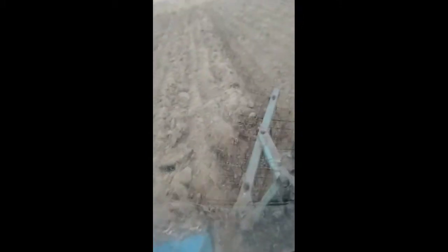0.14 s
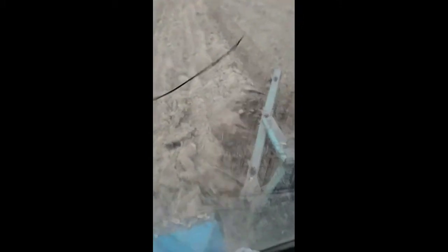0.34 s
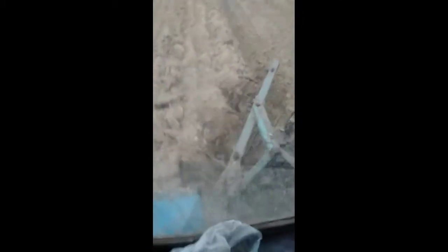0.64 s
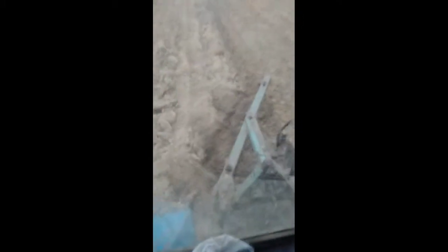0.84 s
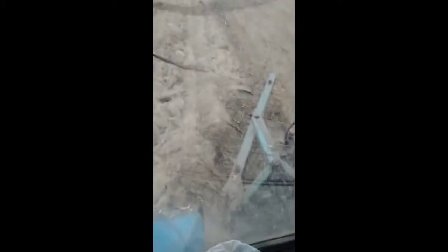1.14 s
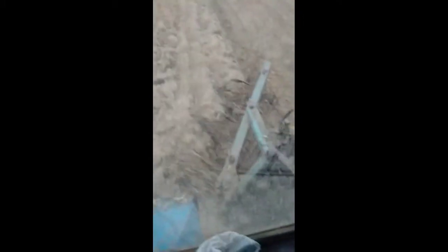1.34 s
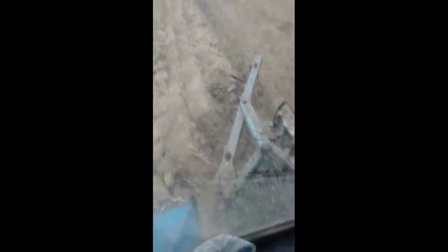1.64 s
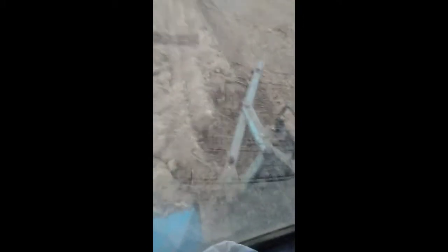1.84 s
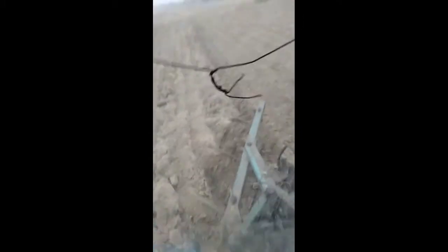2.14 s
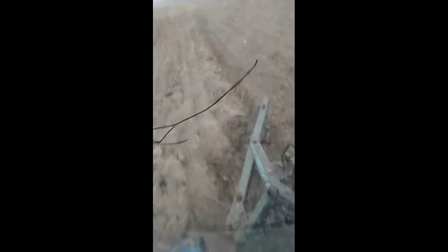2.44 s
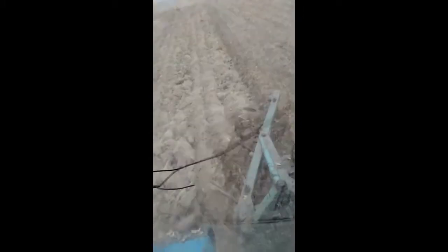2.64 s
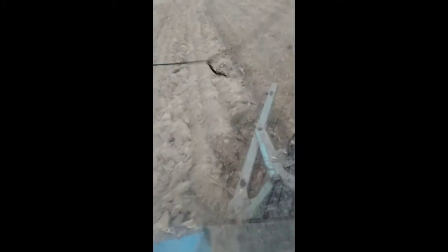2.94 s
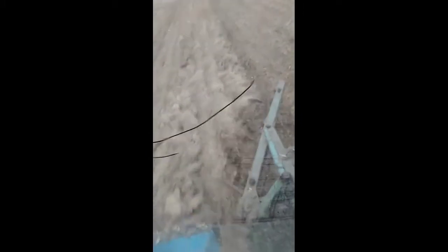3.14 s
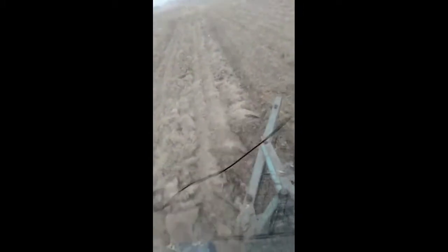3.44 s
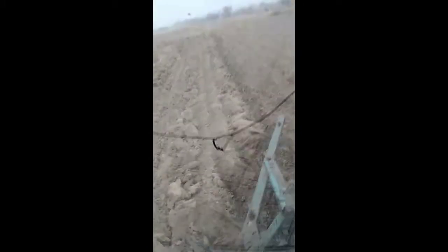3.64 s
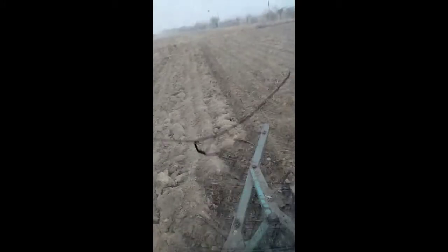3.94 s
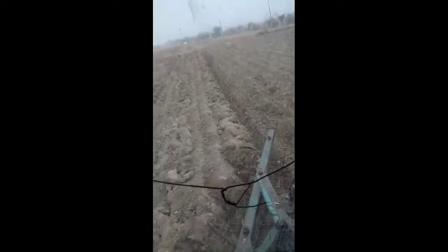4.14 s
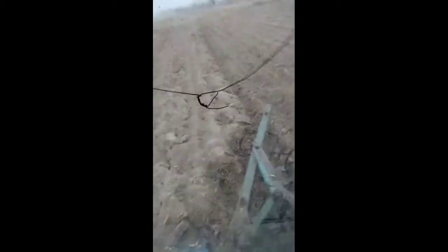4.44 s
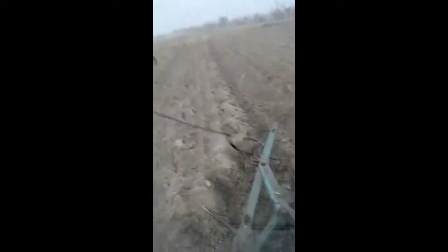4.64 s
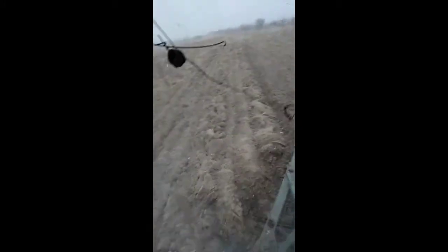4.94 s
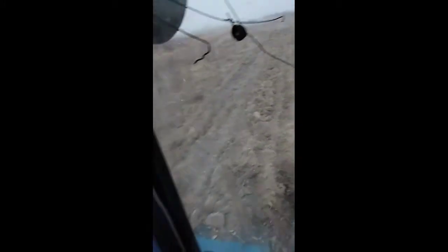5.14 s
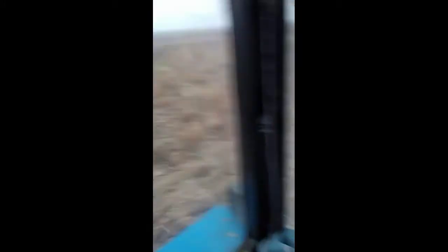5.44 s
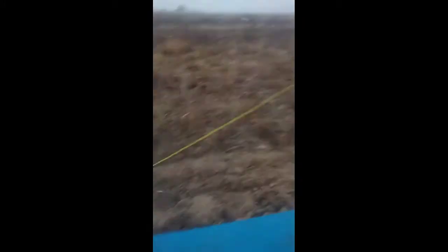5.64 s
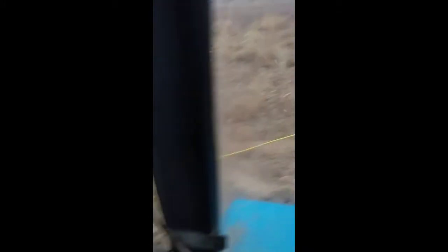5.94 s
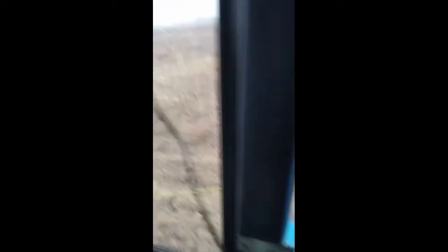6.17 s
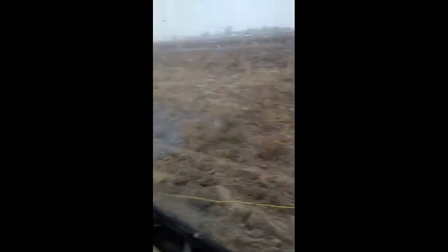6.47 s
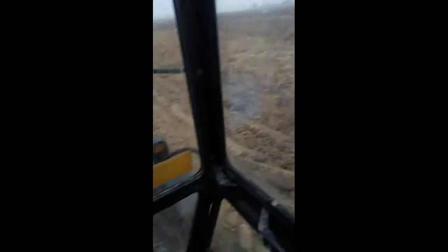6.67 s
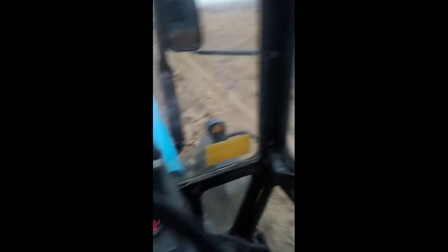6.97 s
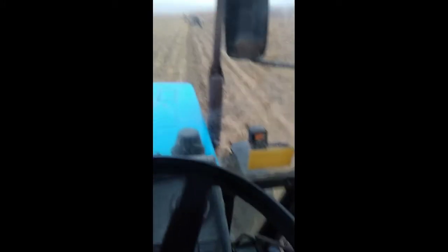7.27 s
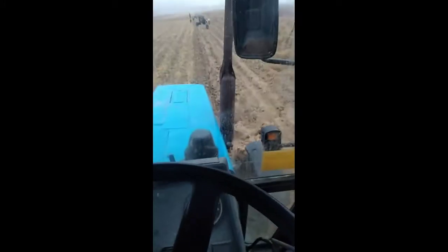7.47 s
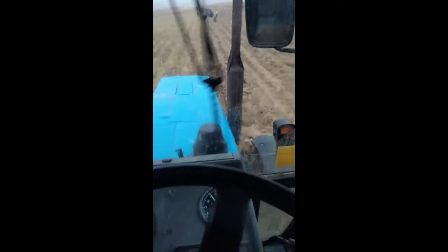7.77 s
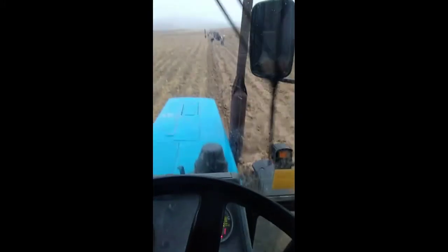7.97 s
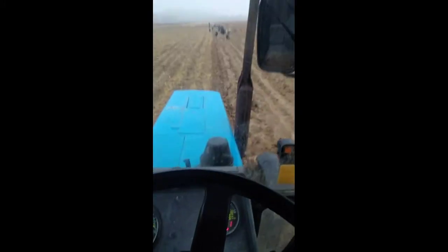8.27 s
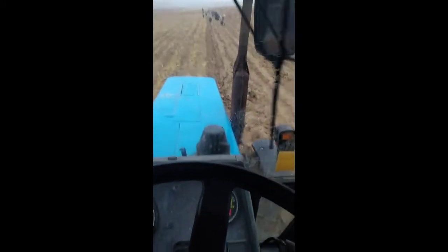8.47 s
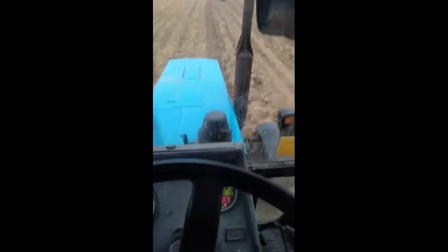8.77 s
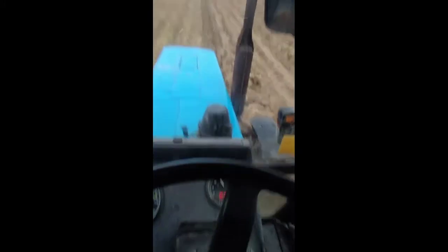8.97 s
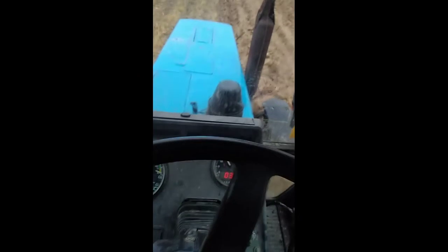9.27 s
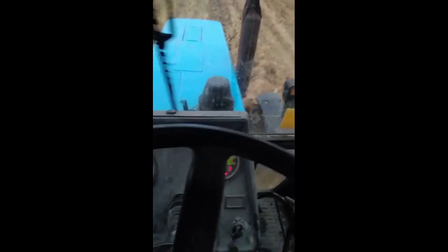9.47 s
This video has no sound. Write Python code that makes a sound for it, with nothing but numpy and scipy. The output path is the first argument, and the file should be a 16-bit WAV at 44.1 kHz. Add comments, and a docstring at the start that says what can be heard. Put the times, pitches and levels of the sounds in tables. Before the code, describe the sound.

Steady diesel engine heard from the driver's seat of a small, vibrating cab. Deep throbbing bass dominates, under broadband mechanical roar, faint glassy ringing and fizzing loose fittings. A few small clacks and squeaky trim ticks come early; then sharper knocks gather as the microphone turns forward, the roar grows harsher and the whine clearer, before everything eases somewhat at the end.

```python
"""Ploughing tractor, inside the cab

A four-cylinder diesel booms at its firing rate; higher orders drone, gear mesh whines at 12x, noise roars.
Filtered noise gives ground rumble and cab swells; struck modes give rattle, knocks and ringing panes.
From 5.25 s the microphone turns from the rear window to the dashboard, mostly within 0.7 s:
the boom's octave thins, roar and whine come forward."""
import sys
import numpy as np
from scipy import signal
from scipy.fft import rfft, irfft, next_fast_len
from scipy.io import wavfile
from scipy.ndimage import uniform_filter1d, minimum_filter1d, map_coordinates

SR = 44100
rng = np.random.default_rng(int(sys.argv[2]) if len(sys.argv) > 2 else 0)


def persist_wave(psi):
    """Save psi, clipped to +-1, as 16-bit WAV."""
    counts = np.round(np.clip(psi, -1, 1) * 32767).astype(np.int16)
    wavfile.write(sys.argv[1], SR, np.atleast_2d(counts).T)


N = 423801
TIME_S = np.arange(N) / SR

# microphone direction: t/s, facing/1 (0 rear window, 1 dashboard)
FACING = [(0, 0.0099), (5.25, 0), (5.6, .4), (5.95, 0.89), (6.6, 0.96), (9.61, 1)]
# engine speed, turning points: t/s, firing rate/Hz
FIRING_RATE = [(0.0, 49.3), (0.26, 48.62), (0.81, 48.65), (1.64, 47.85), (2.0, 49.62), (2.68, 48.3),
               (3.03, 48.96), (3.4, 48.95), (3.81, 48.12), (4.2, 48.66), (4.46, 47.51), (5.3, 47.6),
               (5.51, 49.26), (5.84, 47.56), (6.26, 48.63), (6.86, 47.36), (7.1, 48.96), (7.35, 48.7),
               (7.63, 50.22), (7.98, 48.74), (8.4, 51.06), (8.72, 49.5), (8.9, 50.3), (9.39, 49.56),
               (9.61, 49.4)]
# chassis rumble: t/s, level/dB
RUMBLE_LEVEL = [(0, -18.5), (2, -16), (5.2, -16.5), (7.4, -15.5), (8.7, -20), (9.61, -24)]
# chassis rumble spectrum: f/Hz, relative density/dB
RUMBLE_SPECTRUM = [(4, -28), (10, -23), (17, 2), (24, 0), (32, 0), (38, -15), (43, 4), (49, 8), (56, 0.5),
                   (62, -4.5), (75, -17.5), (100, -37), (200, -58)]
# swelling cab resonances: start t/s, level/dB, f/Hz, width/Hz, length/s
CAB_SWELLS = [(3.45, -29, 156.2, 16, 0.91), (4, -44, 1456, 120, 2.7), (5.55, -26, 234.6, 12.4, 0.6),
              (5.7, -51, 2835, 43, 1.5), (6.9, -53, 4348, 34.6, 0.86), (7.05, -29.5, 299, 39, 0.81),
              (8.17, -31, 220, 26.7, 0.46)]
# chirps of rubbing trim: start t/s, level/dB, f/Hz, width/Hz
TRIM_CHIRPS = [(3.042, -40, 5530, 700), (3.036, -39, 7600, 2200), (4.252, -43, 8500, 300),
               (6.085, -38, 2780, 400), (6.162, -38, 5600, 600), (6.285, -39, 1903, 1000),
               (7.42, -43, 4360, 150), (7.475, -38, 8550, 400), (9.221, -48, 7000, 903),
               (9.512, -47, 5670, 900)]
# modes of glass and dashboard: f/Hz, relative level/dB, t60/s
PANE_MODES = [(1860, -4, .1), (2009, 6.5, 0.17), (2430, 1.5, 0.2), (2804, 0.5, 0.16), (2970, 2.5, 0.17),
              (3270, -10, 0.19), (3590, -2, .15), (4410, 0.5, 0.16), (4970, -10, .12), (6440, 2, 0.11)]
# modes of the loose fittings: f/Hz, relative level/dB, t60/s
FITTING_MODES = [(2873, -17, 0.061), (4380, -17.5, 0.086), (4960, -18.5, .07), (6380, -13, 0.038),
                 (7740, -6.5, 0.043), (9250, -1.5, 0.055), (9344, -1.5, 0.027), (11060, 1.5, 0.025),
                 (12400, -2, .01), (14260, -11, .07)]
# hard knocks of the fittings: t/s, strength/dB
FITTING_KNOCKS = [(0.389, -31.5), (1.369, -33), (4.256, -31), (4.455, -27), (4.831, -32), (4.916, -29.5),
                  (5.704, -28.5), (6.084, -26.5), (6.241, -24), (6.432, -26), (6.515, -29), (6.654, -24),
                  (7.489, -29), (7.969, -34)]
# rattle, before the fizz and tap offsets: t/s, level/dB
RATTLE_LEVEL = [(0.0, -38), (0.08, -34.5), (1.26, -33.5), (2.33, -36), (2.59, -34), (3.43, -36),
                (5.49, -32), (5.73, -29.5), (5.99, -33), (6.53, -30), (7.09, -35), (7.12, -33),
                (9.31, -39.5), (9.61, -43)]
# fine rattle spectrum: f/Hz, relative density/dB
FIZZ_SPECTRUM = [(1500, -21), (3500, -6.5), (5500, -8.5), (7000, -6), (8300, -3.5), (9900, -1.5),
                 (10900, 0), (11700, -0.5), (12400, 0.5), (13800, -5.5), (15400, -12)]
# engine roar, gain on its spectrum: t/s, level/dB
ROAR_LEVEL = [(0, -15), (.8, -14.5), (1.5, -16), (4.5, -15.5), (5.5, -13), (6.6, -10.5), (7.7, -11),
              (8.65, -13), (8.8, -15), (9.3, -15), (9.61, -21.5)]
# engine roar spectrum: f/Hz, relative density at rear/dB, at dashboard/dB
ROAR_SPECTRUM = [(40, 7, -14), (77, 16, 0), (107, 14.5, 10), (168, 13, 1.5), (226, 7.5, 8.5),
                 (303, 8.5, 10.5), (357, 0, 3), (525, 2, 0), (865, -3.5, -3), (1440, -7, -7),
                 (1570, -9.5, -11.5), (1945, -11.5, -12.5), (2450, -17, -19.5), (4800, -27, -25.5),
                 (12000, -31, -34)]
# gear mesh fundamental: t/s, level/dB
WHINE_LEVEL = [(0, -28.5), (0.65, -26.5), (0.92, -21), (1.3, -37), (1.59, -26), (2.3, -26.5), (2.8, -31.5),
               (3.55, -25), (3.9, -33), (4.25, -25.5), (4.47, -36.5), (5.38, -41), (5.6, -25), (5.9, -39),
               (6.05, -29.5), (6.94, -29), (7.15, -22.5), (8.05, -23), (8.39, -36.5), (8.6, -27.5),
               (9.61, -30)]
# steady engine orders: multiple of firing rate/1, level at rear/dB, at dashboard/dB
ENGINE_ORDERS = [(2.75, -42, -43), (3, -33.5, -39), (6.51, -43, -34), (8.01, -42, -44.5), (10.7, -53, -47),
                 (14.29, -55, -55), (14.85, -45.5, -50), (17.34, -48.5, -58), (18.04, -45, -45.5),
                 (19.05, -50.5, -49), (21.07, -53.5, -53), (22.9, -48.5, -62)]
# boom at the firing rate, before the beat weakening: t/s, level/dB
BOOM_LEVEL = [(0, -10), (.6, -10), (3.4, -11), (5.2, -10), (7.8, -10), (8.8, -12.5), (9.1, -17.5),
              (9.61, -15)]
# moments when boom and rumble beat and the low end weakens: t/s, depth/dB
LOW_END_BEATS = [(0.9, 4), (3.4, 16), (3.78, 16), (4.3, 6), (4.53, 4), (5.34, 3), (6.3, 7), (6.53, 10),
                 (7.39, 25)]

CHIRP_S = 0.025
BEAT_S = 0.056  # from centre to 1/e of the depth
OCTAVE_DB, NODE_FACING = -6.5, 0.816  # boom's octave re boom at the rear; facing at its node
PANEL_HZ, PANEL_WIDTH_HZ, PANEL_LIFT_DB = 284.5, 2.79, 5
EDGE_HZ = 15480


def amp(db):
    """Decibels to gain."""
    return 10 ** (np.asarray(db) / 20)


def unit(x):
    """Scales to rms 1."""
    return x / np.sqrt(np.mean(x ** 2) + 1e-20)


def curves(rows):
    """Table columns, linear in time."""
    time_s, *columns = np.transpose(rows)
    return [np.interp(TIME_S, time_s, column) for column in columns]


def glide(rows):
    """Curve easing from each turning point to the next."""
    time_s, value = np.transpose(rows)
    steps = np.arange(len(time_s))
    place = np.interp(TIME_S, time_s, steps)
    eased = place - np.sin(2 * np.pi * place) / (2 * np.pi)
    return np.interp(eased, steps, value)


def colour(x, hz, db):
    """Filters x by a spectrum drawn on a log-frequency axis."""
    size = next_fast_len(N)
    bins_hz = np.fft.rfftfreq(size, 1 / SR)
    gain_db = np.interp(np.log(bins_hz + 1), np.log(hz), db)
    return irfft(rfft(x, size) * amp(gain_db), size)[:N]


def waver(rate_hz):
    """Slow noise of rms 1, rolling off above about rate_hz."""
    noise = rng.standard_normal(N // 64)
    bins_hz = np.fft.rfftfreq(len(noise), 64 / SR)
    slow = irfft(rfft(noise) / (1 + (bins_hz / rate_hz) ** 4))
    return np.interp(TIME_S, np.linspace(0, TIME_S[-1], len(slow)), unit(slow))


def add(mix, start_s, sound):
    """Mixes a sound in at start_s."""
    part = mix[max(round(start_s * SR), 0):][:len(sound)]
    part += sound[:len(part)]


def tone(cycles, level_db, flutter):
    """Shaft-locked line; two slow wavers flutter its strength and phase."""
    angle = 2 * np.pi * cycles
    in_phase = (1 + flutter * waver(11.4)) * np.cos(angle)
    quadrature = flutter * waver(8.1) * np.sin(angle)
    return np.sqrt(2) * amp(level_db) * (in_phase + quadrature)


def patchy(x, patch_db, size=512):
    """Small parts join in and drop out: random time-frequency patches of gain."""
    spectrum = signal.stft(x, nperseg=size)[2]
    patches = rng.standard_normal(spectrum.shape)
    patches = uniform_filter1d(patches, size=5, axis=0)
    patches = unit(uniform_filter1d(patches, size=9, axis=1))
    return signal.istft(spectrum * amp(patch_db * patches), nperseg=size)[1][:N]


def ring(blows, modes, unevenness=0.91):
    """Decaying modes, each struck with its own random strength by every blow."""
    t, out = np.arange(SR // 7) / SR, np.zeros(N)
    for hz, db, t60_s in modes:
        mode = amp(db - 60 * t / t60_s) * np.sin(2 * np.pi * hz * t)
        strikes = blows * (1 + unevenness * rng.standard_normal(N))
        out += signal.oaconvolve(strikes, mode)[:N]
    return out


def rumble(level_db):
    """Rough ground shakes the chassis and stirs the cab's lowest resonance: low noise."""
    return amp(level_db) * unit(colour(rng.standard_normal(N), *np.transpose(RUMBLE_SPECTRUM)))


def resonances(rows):
    """Rough shaking feeds one resonance for a moment: noise in a narrow peak, under a half-sine."""
    out, t = np.zeros(N), np.arange(3 * SR) / SR
    bins_hz = np.fft.rfftfreq(len(t), 1 / SR)
    for start_s, db, hz, width_hz, length_s in rows:
        peak = 1 / (1 + (2 * (bins_hz - hz) / width_hz) ** 2)
        sound = irfft(rfft(rng.standard_normal(len(t))) * peak, len(t))
        inside = t < length_s
        sound = sound[inside] * np.sin(np.pi * t[inside] / length_s)
        add(out, start_s, amp(db) * unit(sound))
    return out


def panes(roar_db, below_db=-35):
    """Glass and dashboard modes ring under steady noise, at a level following the roar."""
    ringing = ring(rng.standard_normal(N), PANE_MODES)
    return amp(roar_db + below_db) * unit(patchy(ringing, patch_db=5.0))


def knocks(scrape_s=0.0049):
    """Jolts throw the fittings against their seats: decaying noise contacts strike their modes."""
    t, blows = np.arange(SR // 50) / SR, np.zeros(N)
    for start_s, db in FITTING_KNOCKS:
        contact = rng.standard_normal(len(t)) * np.exp(-t / scrape_s)
        add(blows, start_s, amp(db) * contact / np.linalg.norm(contact))
    return ring(blows, FITTING_MODES)


def rattle(firings, level_db, flicker_db=1.18, bunching=2.2, rms_taps_per_s=240, spread_db=0.5,
           fizz_db=-0.8, taps_db=-6.5):
    """Loose metal fizzes and taps, most often at the top of each engine shake."""
    fizz = colour(rng.standard_normal(N), *np.transpose(FIZZ_SPECTRUM))
    fizz = patchy(fizz * amp(flicker_db * waver(43)), patch_db=1.75)

    shake = np.cos(2 * np.pi * firings)
    chance = unit(np.exp(bunching * shake)) * rms_taps_per_s / SR  # per sample
    strength = amp(spread_db * np.minimum(rng.exponential(1, N), 3))
    blows = (rng.random(N) < chance) * strength
    taps = patchy(ring(blows, FITTING_MODES), patch_db=2.0)
    return amp(level_db + fizz_db) * unit(fizz) + amp(level_db + taps_db) * unit(taps)


def roar(firings, facing, level_db, repeat_share=0.36, throb=0.15, count=2048):
    """Combustion and valve clatter: noise, part repeating every four firings, part always new."""
    cycle = unit(irfft(np.exp(2j * np.pi * rng.random(count // 2 + 1))))
    place = firings / 4 % 1 * count
    locked = unit(map_coordinates(cycle, [place], order=3, mode="grid-wrap"))
    locked = colour(locked, [40, 200, 1300, 3500], [-3.5, -4, -4.5, -4.0])
    loose = unit(rng.standard_normal(N) * (1 + throb * np.cos(2 * np.pi * firings)))
    # power shares before the locked part's colouring
    drive = np.sqrt(repeat_share) * locked + np.sqrt(1 - repeat_share) * loose

    hz, rear_db, front_db = np.transpose(ROAR_SPECTRUM)
    heard = (1 - facing) * colour(drive, hz, rear_db) + facing * colour(drive, hz, front_db)
    return amp(level_db) * heard


def whine(firings, rate_hz, facing, roar_db, swing_cycles=0.01, rear_db=-30.5, front_db=-22.5,
          rear_db_per_hz=7.0, front_db_per_hz=2.0, wander_db=2.5):
    """Gear mesh at 12x firing, with side tones from uneven turning; its octave rides on the roar."""
    swing = np.sin(np.pi * firings / 2) + np.sin(np.pi * firings)
    mesh = 12 * firings + swing_cycles * swing
    faster_hz = rate_hz - np.median(rate_hz)
    front = np.sqrt(facing)
    at_rear_db = rear_db + rear_db_per_hz * faster_hz
    at_front_db = front_db + front_db_per_hz * faster_hz
    octave_db = roar_db + (1 - front) * at_rear_db + front * at_front_db + wander_db * waver(1.9)
    return tone(mesh, curves(WHINE_LEVEL)[0], flutter=0.19) + tone(2 * mesh, octave_db, flutter=0.25)


def drone(firings, rate_hz, facing, roar_db, fourth_db=-18.5, sixth_db=-18.5, front_db=-2.5, wander_db=1.5):
    """Engine orders hum in the panels; 4 and 6 follow the roar, 6 swells near a panel resonance."""
    detune = 2 * (6 * rate_hz - PANEL_HZ) / PANEL_WIDTH_HZ
    lift_db = PANEL_LIFT_DB / (1 + detune ** 2)
    out = np.zeros(N)
    for multiple, db in [(4, fourth_db), (6, sixth_db + lift_db)]:
        level_db = roar_db + db + facing * front_db + wander_db * waver(2.6)
        out += tone(multiple * firings + rng.random(), level_db, flutter=0.28)
    for multiple, order_rear_db, order_front_db in ENGINE_ORDERS:
        level_db = order_rear_db + facing * (order_front_db - order_rear_db)
        out += tone(multiple * firings + rng.random(), level_db, flutter=0.34)
    return out


def boom(firings, facing):
    """Each firing pulls the cab air into a trough: firing rate plus a standing octave with a node."""
    level_db = curves(BOOM_LEVEL)[0]
    # the low end's beat weakening, carried by the fundamental
    beats_db = sum(depth_db * np.exp(-((TIME_S - s) / BEAT_S) ** 2) for s, depth_db in LOW_END_BEATS)
    standing = np.cos(np.pi / 2 * facing / NODE_FACING)  # sign flips past the node
    fundamental = tone(firings, level_db - beats_db, flutter=0.074)
    octave = tone(2 * firings, level_db + OCTAVE_DB, flutter=0.087)
    return -fundamental - standing * octave


def scene(roar_wander_db=0.57, jolt_db=0.63):
    """One shaft drives the engine layers; the field's jolts vary roar and rattle together."""
    jolts = waver(12)
    roar_db = curves(ROAR_LEVEL)[0] + roar_wander_db * jolts
    rattle_db = curves(RATTLE_LEVEL)[0] + jolt_db * jolts
    facing = np.clip(curves(FACING)[0], 0, 1)
    rate_hz = glide(FIRING_RATE)
    firings = np.cumsum(rate_hz) / SR

    cab = rumble(*curves(RUMBLE_LEVEL)) + resonances(CAB_SWELLS) + panes(roar_db)
    trim = resonances([(*row, CHIRP_S) for row in TRIM_CHIRPS])
    fittings = knocks() + rattle(firings, rattle_db)
    engine = roar(firings, facing, roar_db) + whine(firings, rate_hz, facing, roar_db)
    engine += drone(firings, rate_hz, facing, roar_db) + boom(firings, facing)
    return (cab + trim + fittings + engine)[None]


def record(dry, ceiling=0.95):
    """Limiter on the tallest swings, 3 ms end fades, then a low-pass at EDGE_HZ."""
    room = np.minimum(1, ceiling / (abs(dry) + 1e-9))
    gain = uniform_filter1d(minimum_filter1d(room, size=600), size=600)
    fade = np.minimum(1, np.minimum(TIME_S, TIME_S[::-1]) / 0.003)
    low_pass = signal.firwin(611, EDGE_HZ, window=("kaiser", 10), fs=SR)
    return signal.oaconvolve(dry * gain * fade, low_pass[None], "same")


dry = scene()
out = record(dry)
persist_wave(out)
```